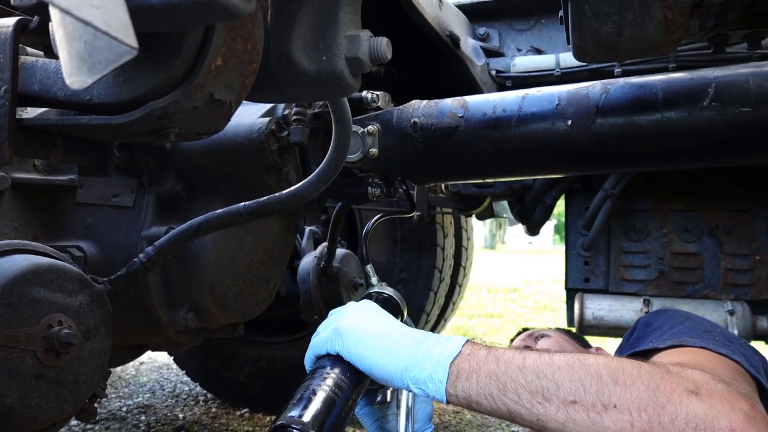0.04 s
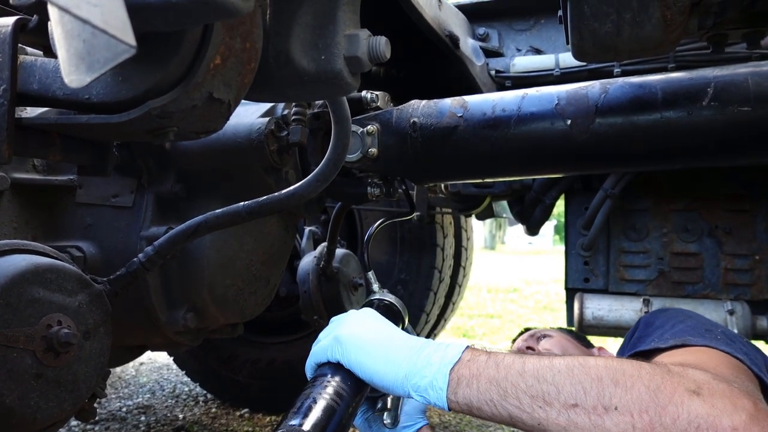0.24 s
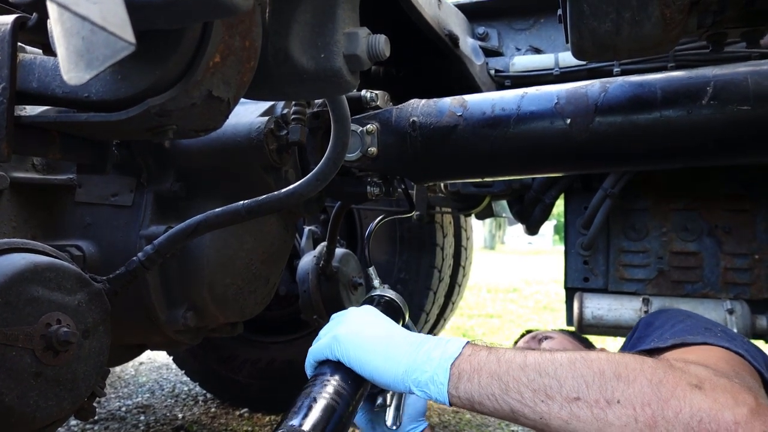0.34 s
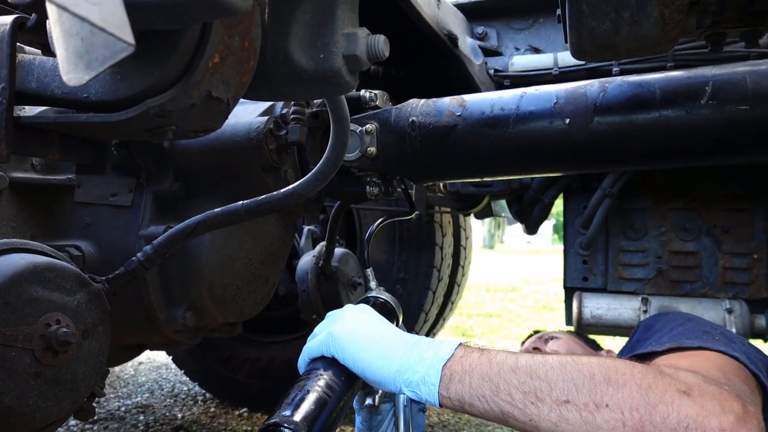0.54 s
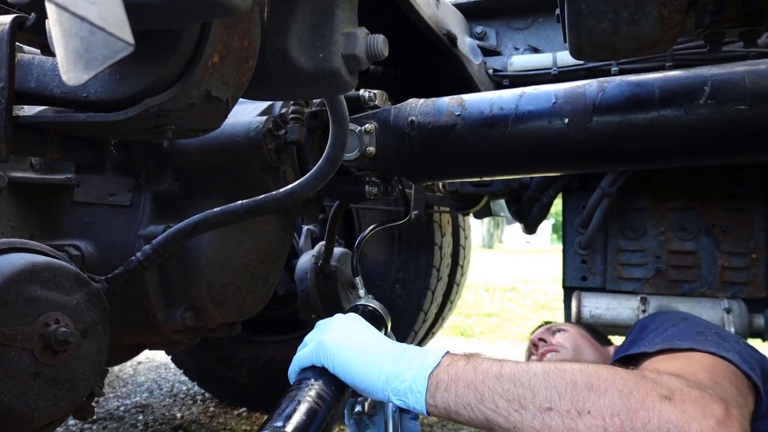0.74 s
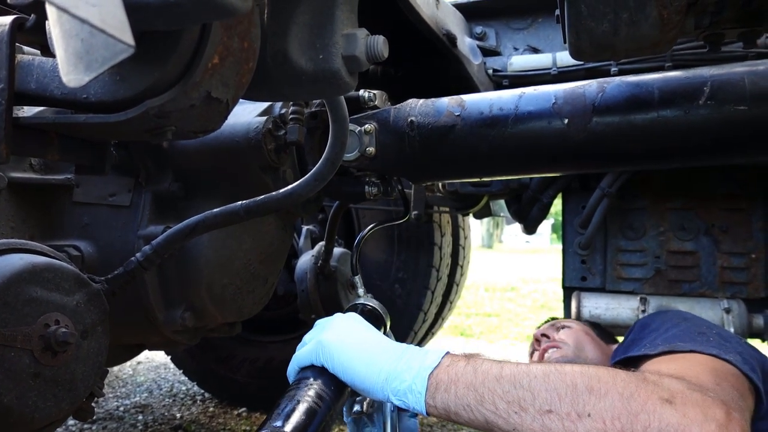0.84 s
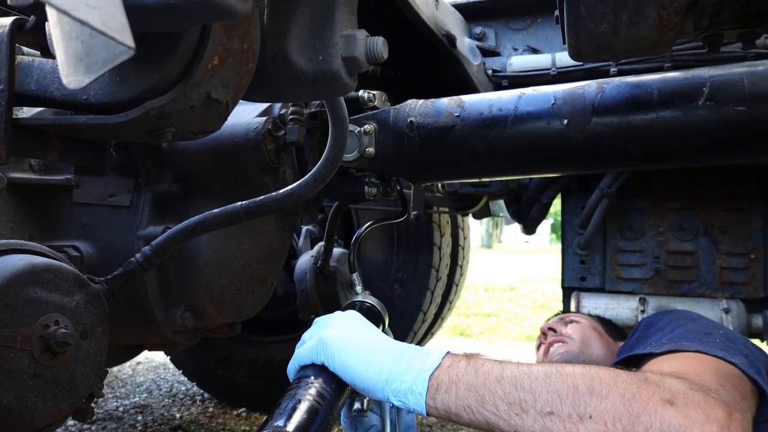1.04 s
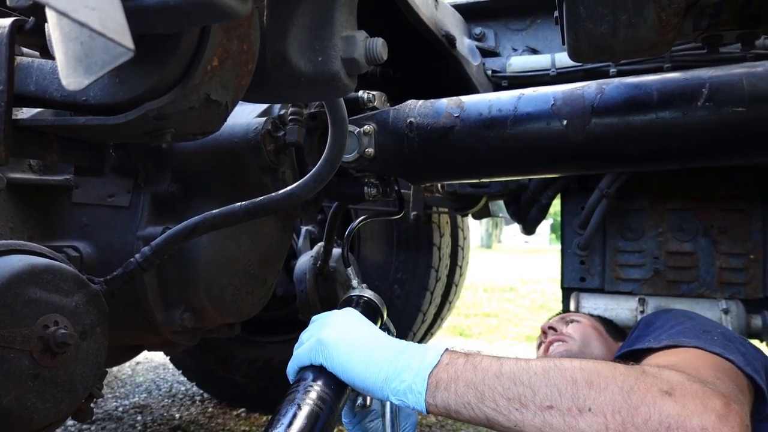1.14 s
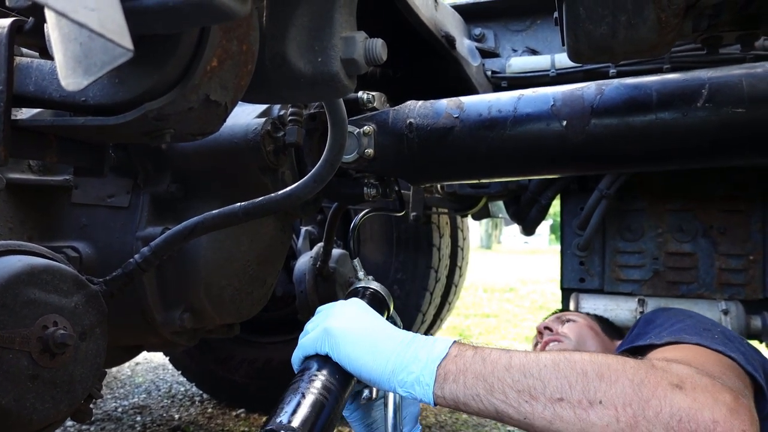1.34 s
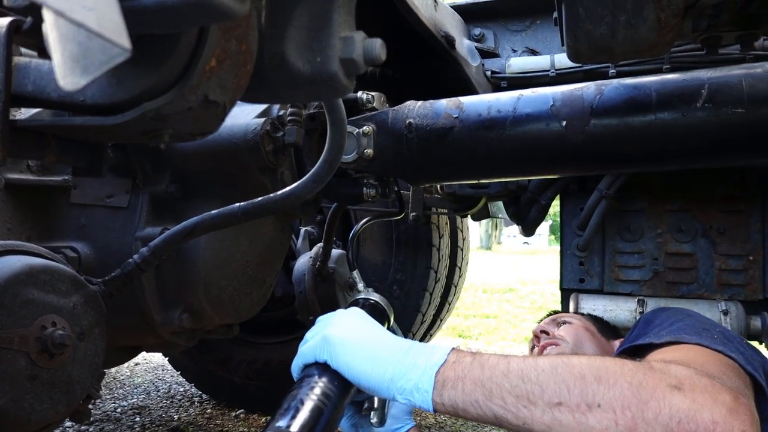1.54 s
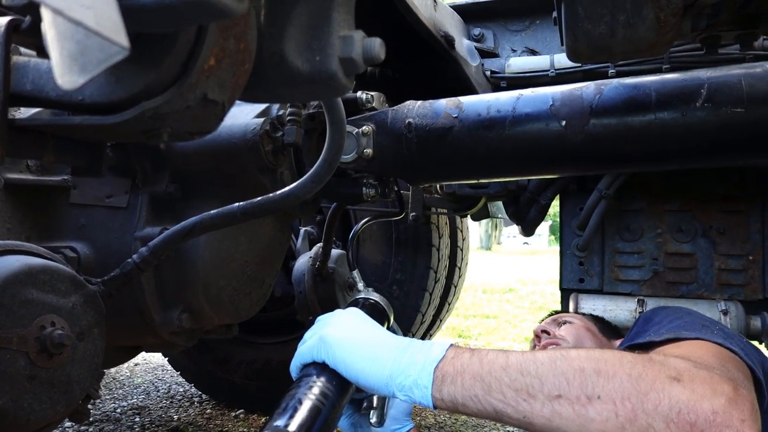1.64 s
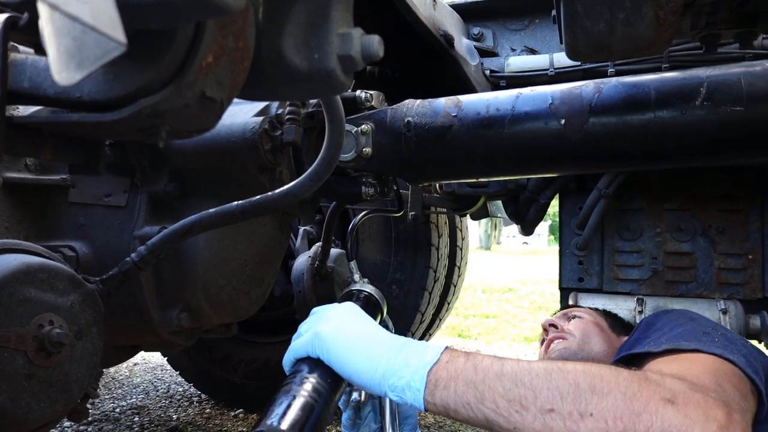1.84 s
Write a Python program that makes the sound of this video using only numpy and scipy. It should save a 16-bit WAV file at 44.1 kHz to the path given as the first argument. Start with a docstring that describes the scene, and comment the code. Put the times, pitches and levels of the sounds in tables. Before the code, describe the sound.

A lever grease gun worked under a truck: faint rubbing, small scrapes and ticks, a loud metallic clack with a quick loose rattle, near quiet with a distant bird, then a double clack, heard close outdoors.

```python
"""A low hum in outdoor air and a faint plunger rub, then a lever grease gun worked under a truck.
Coupler scrapes, lever clacks, ticks and a loose steel rattle are spiky contact forces ringing metal modes;
chassis reflections surround them. Knocks are damped cycles, the rub is resonant friction noise, and a far
bird whistles in swept sines. Hum and air drop at the loud clack (0.5 s), the rattle (0.6 s) and a late clack (1.6 s)."""
import sys
import numpy as np
from scipy import signal
from scipy.fft import rfft, irfft
from scipy.io import wavfile
from scipy.ndimage import uniform_filter1d

SR = 44100
rng = np.random.default_rng(int(sys.argv[2]) if len(sys.argv) > 2 else 0)


def rack_gain(trim_db):
    """Turn a fader trim in dB into the linear factor to multiply a signal by."""
    fader = np.asarray(trim_db, float)
    return 10 ** (fader / 20)


def unload_audio(sound):
    """Save the sound as a 16-bit wav file, at the path given as the first command line argument."""
    columns = np.transpose(np.atleast_2d(sound))
    # keep every value between -1 and 1, then stretch to whole-number steps
    steps = np.round(np.clip(columns, -1, 1) * 32767)
    wavfile.write(sys.argv[1], SR, steps.astype(np.int16))


N = 83790  # samples, 1.9 s


def unit(x):
    """Scale to rms 1."""
    return x / np.sqrt(np.mean(x ** 2))


def curve(rows):
    """Join the (second, value) rows by straight lines."""
    seconds, values = np.array(rows).T
    return np.interp(np.arange(N) / SR, seconds, values)


def band(x, hz, width_hz):
    """Resonant band-pass."""
    return signal.lfilter(*signal.iirpeak(hz, hz / width_hz, SR), x)


def walk(rate):
    """Smooth random wander, spread 1; a higher rate wanders faster."""
    k = int(SR / rate)
    return unit(uniform_filter1d(uniform_filter1d(rng.standard_normal(N), k), k))


def add(out, start_s, db, x):
    """Place a sound at its time and peak level."""
    i = int(start_s * SR)
    x = x[:N - i]
    out[i:i + len(x)] += rack_gain(db) * x / np.abs(x).max()


def decay(t, t60_s):
    """Exponential fade, 60 dB down after t60_s."""
    return np.exp(-np.log(1000) * t / t60_s)


def hump(hz, octaves, node_hz=20):
    """Weight in dB of a contact that favours one region and misses the modes at its node."""
    def weight_db(f):
        favoured = np.maximum(-6 * (np.log2(f / hz) / octaves) ** 2, -40)
        node = -11 * np.exp(-(np.log2(f / node_hz) / 0.24) ** 2)
        return favoured + node
    return weight_db


def ring(push, modes, t60_s, weight_db, crack_db):
    """A contact force rings clusters of close partials and a dense shell; the bare crack rides on top."""
    t = np.arange(len(push)) / SR
    hz, db = np.array(modes).T[:, :, None]
    # three close partials per mode, scattered by 1.4 %
    partials = sum(np.sin(2 * np.pi * hz * (1 + .014 * rng.standard_normal(hz.shape)) * t) for _ in range(3))
    # t60_s holds at 1 kHz; higher modes die sooner
    free = decay(t, t60_s * (hz / 1000) ** -0.52) * partials
    driven = signal.fftconvolve(free, push[None], axes=1)
    driven = driven / np.linalg.norm(driven, axis=1, keepdims=True)
    body = (rack_gain(db + weight_db(hz)) * driven).sum(axis=0)

    f = np.maximum(np.fft.rfftfreq(128, 1 / SR), 50)
    colour = irfft(rack_gain(weight_db(f)) / (1 + (900 / f) ** 6))  # low cut near 900 Hz
    colour = np.roll(colour, 64) * np.hanning(128)
    crack = signal.fftconvolve(push, colour)[64:64 + len(t)]
    shell = signal.fftconvolve(crack, rng.standard_normal(len(t)) * decay(t, 0.04))

    layers = [(body, 0), (shell, -7), (crack, crack_db)]  # peak dB
    return sum(rack_gain(db) * x[:len(t)] / np.abs(x).max() for x, db in layers)


MS = np.arange(5000) / SR * 1000  # time within one contact
GUN_T60_S = 0.06  # at 1 kHz


def grit(spike_db):
    """Noise of micro-impacts, spikier as the mean random boost spike_db grows."""
    return rng.standard_normal(len(MS)) * rack_gain(spike_db * rng.exponential(1, len(MS)))


# Modes of the gun body. Each row: pitch in Hz, level in dB before the contact weighting.
GUN_MODES = [(800, -7), (1020, 7), (1250, -0.5), (1960, 3), (3060, -3.5), (3730, -6.5), (4080, -4),
             (4450, -1), (5560, 0.5), (6050, 3.5), (6930, 6), (7700, -0.5), (9400, 3.5), (10150, 6.5),
             (11100, 3), (12300, 5), (14300, 4.5)]
# Lever clacks on the gun body.
# Each row: start in seconds, peak in dB before high-pass and reflections, favoured centre in Hz,
# node in Hz (modes near it stay quiet), contact fade in ms.
CLACKS = [(0.482, -29, 3020, 2500, 1.8), (0.4972, -9.5, 3400, 8900, 0.86), (1.166, -57.5, 8000, 2020, 4.9),
          (1.521, -45.5, 4830, 2530, 4.8), (1.5724, -18, 4230, 9200, 3.4), (1.6048, -12, 2330, 3100, 1.74),
          (1.692, -52.5, 7000, 2000, 2.8), (1.787, -56.5, 9180, 2000, 1.2), (1.809, -55, 6000, 2000, 4.1)]


def clacks():
    """The lever strikes the gun body: one sharp impact 0.4 ms into a gritty fading contact."""
    out = np.zeros(N)
    for start_s, db, hz, node_hz, contact_ms in CLACKS:
        push = 0.39 * grit(0.92) * np.exp(-MS / contact_ms) * np.minimum(MS / .4, 1)
        push = push + 3 * (np.abs(MS - .4) < .012)
        add(out, start_s, db, ring(push, GUN_MODES, GUN_T60_S, hump(hz, 1.48, node_hz), -2.5))
    return out


# Coupler scrapes on the gun body.
# Each row: start in seconds, peak in dB before high-pass and reflections, rise in ms,
# favoured centre in Hz, node in Hz.
SCRAPES = [(0.2193, -20, 8.5, 6260, 2200), (0.3568, -23, 0.63, 7000, 1200), (0.377, -37, 1.5, 7930, 1206),
           (0.4337, -27.5, .6, 16000, 5600), (.5250, -24.5, 4.5, 5500, 2940), (1.598, -43, 3.9, 3430, 8800)]


def scrapes():
    """The coupler drags on metal: very spiky friction that swells, then fades through the gun body."""
    out = np.zeros(N)
    for start_s, db, rise_ms, hz, node_hz in SCRAPES:
        swell = np.where(MS < rise_ms, .4 + .6 * MS / rise_ms, np.exp(-(MS - rise_ms) / 7.7))
        push = grit(2.5) * swell
        add(out, start_s, db, ring(push, GUN_MODES, GUN_T60_S, hump(hz, 2.03, node_hz), -2))
    return out


# Modes of the loose steel part. Each row: pitch in Hz, level in dB before the contact weighting.
LOOSE_MODES = [(1250, -4), (1650, -16.5), (2250, 3.5), (2450, -2), (3250, -12.5), (3920, -6.5), (4130, 9),
               (4320, 3.5), (4650, -7), (5080, 4), (5900, -3), (7400, 8), (9040, 1), (10400, -12)]
# Rattle bounces.
# Each row: start in seconds, peak in dB before high-pass and reflections, contact length in ms.
BOUNCES = [(.5855, -30, 1.2), (.5881, -12, 1), (.5905, -12, 1), (.5972, -21, 1.4), (.6016, -18, 1.8),
           (.6100, -23, 2), (.6150, -33, 2), (.6205, -30, 1), (.6260, -36, 2), (.6314, -35, 1.3),
           (.6394, -32, 1.2), (.6504, -35, 1.9), (.660, -48, 3), (.684, -50, 1.5), (.7079, -57, 1)]


def rattle():
    """A loose steel part bounces: short spiky contacts ring its own modes, strongest near 4.5 kHz."""
    out = np.zeros(N)
    for start_s, db, contact_ms in BOUNCES:
        push = grit(2) * np.exp(-(MS / contact_ms) ** 2)
        add(out, start_s, db, ring(push, LOOSE_MODES, 0.12, hump(4480, 1), -10.5))
    return out


# Modes of the lever link. Each row: pitch in Hz, level in dB before the contact weighting.
LINK_MODES = [(3720, -11.5), (5370, -0.5), (5800, -6.5), (7450, -5), (9040, -4), (10600, -14),
              (12500, -9.5), (14200, -7.5)]
# Ticks of the lever link.
# Each row: start in seconds, peak in dB before high-pass and reflections, favoured centre in Hz,
# contact fade in ms.
TICKS = [(0.28, -39.5, 8040, 4), (.302, -44.5, 5000, 2.6), (0.3281, -28, 6100, 0.61),
         (0.7465, -57, 8000, 0.36), (0.8333, -58, 5600, .9), (0.953, -61.5, 5320, .8)]


def ticks():
    """The lever link ticks: fading gritty contacts excite a narrow region of its modes."""
    out = np.zeros(N)
    for start_s, db, hz, contact_ms in TICKS:
        push = grit(1) * np.exp(-MS / contact_ms)
        add(out, start_s, db, ring(push, LINK_MODES, .07, hump(hz, 0.57), -11.5))
    return out


def metal():
    """All ringing metal contacts, thinned below 450 Hz by a high-pass."""
    contacts = clacks() + ticks() + scrapes() + rattle()
    return signal.sosfilt(signal.butter(2, 450, "high", fs=SR, output="sos"), contacts)


# Dull knocks of the barrel against the hand.
# Each row: start in seconds, peak in dB before reflections, pitch in Hz, thud in dB before peak scaling.
KNOCKS = [(0.2672, -31.5, 2020, -4), (1.034, -59, 2650, -21.5), (1.19, -51, 1810, -2)]


def knocks():
    """A few quickly damped cycles at two pitches over a soft thud."""
    out, ms = np.zeros(N), np.arange(800) / SR * 1000

    def wave(hz, fade_ms):
        return np.sin(2 * np.pi * hz * ms / 1000) * ms / fade_ms * np.exp(-ms / fade_ms)

    for start_s, db, hz, thud_db in KNOCKS:
        knock = wave(hz, 0.55) + wave(hz / 1.58, 1.1 / 3)
        thud = rack_gain(thud_db) * wave(328, 1)
        add(out, start_s, db, knock + thud)
    return out


def chassis(x):
    """Short dense reflections between frame and ground, as noise that builds up and decays."""
    t = np.arange(8000) / SR
    echo = rng.standard_normal(len(t)) * decay(t, 0.13) * np.minimum(t / 0.0091, 1)
    echo = band(echo, 1200, 4500)
    echo = echo / np.linalg.norm(echo)
    return x + rack_gain(-19.5) * signal.fftconvolve(x, echo)[:N]


# Plunger rub at the microphone. Each row: time in seconds, level in dB.
RUB_LEVEL = [(0, -64.5), (.1, -53.5), (.17, -51.5), (.215, -58), (.25, -71), (.5, -58.5), (.6, -67.5),
             (.72, -79.5), (.85, -81.5), (.9, -100), (1.0, -78), (1.1, -83.5), (1.18, -72), (1.33, -84.5),
             (1.43, -72), (1.55, -67), (1.62, -86), (1.8, -81), (1.88, -64.5), (1.9, -76)]
# Rub resonances. Each row: centre in Hz, width in Hz of each of two passes, mean level in dB against the others.
RUB_PEAKS = [(493, 93, -15), (940, 160, -7.5), (2010, 310, -6.5), (3900, 1000, 3), (4470, 270, -6),
             (5600, 790, -7.5), (7480, 1600, -9.5), (12000, 5400, -19.5)]


def rub():
    """Fine friction of the plunger through a few resonances that flicker on their own."""
    friction = rng.standard_normal(N) * rack_gain(2 * walk(130))
    total = np.zeros(N)
    for hz, width_hz, db in RUB_PEAKS:
        flicker_db = 1.5 * walk(40)
        peak = unit(band(band(friction, hz, width_hz), hz, width_hz))
        total += rack_gain(db + flicker_db) * peak
    return rack_gain(curve(RUB_LEVEL)) * unit(total)


# Notes of the far bird. Each row: start in seconds, length in seconds, start, middle and end pitch in Hz
# before the fray, peak in dB before the flutter and reflections.
BIRD_NOTES = [(1.08, .05, 5200, 5000, 4300, -74), (1.155, .025, 4300, 4250, 4200, -69),
              (1.17, .012, 3500, 3800, 4300, -66), (1.186, .033, 5700, 5200, 4100, -67),
              (1.19, .015, 3900, 3750, 3600, -67), (1.222, .03, 3500, 3600, 3800, -66),
              (1.258, .042, 3300, 4450, 3500, -64), (1.295, .015, 3600, 3500, 3300, -69)]


def bird():
    """Thin arched whistles, frayed in pitch and level by distance."""
    out, fray_hz = np.zeros(N), 170 * walk(500)
    for start_s, length_s, start_hz, middle_hz, end_hz, db in BIRD_NOTES:
        u = np.linspace(0, 1, int(length_s * SR))
        arch = np.polyfit([0, .5, 1], [start_hz, middle_hz, end_hz], 2)
        hz = np.polyval(arch, u) + fray_hz[int(start_s * SR):][:len(u)]
        whistle = np.sin(2 * np.pi * np.cumsum(hz) / SR)
        add(out, start_s, db, whistle * np.sin(np.pi * u) ** .5)
    flutter = .7 + .7 * walk(400)
    return out * flutter


# Shift of hum and air together. Each row: time in seconds, level in dB.
SINK = [(0, -1), (.495, 1.5), (.505, -6), (.585, -4), (.6, -14), (1.0, -15), (1.6, -12), (1.62, -16.5),
        (1.9, -9)]
# Spectrum of the outdoor air. Each row: frequency in Hz, relative density in dB per Hz before the 45 Hz low cut.
AIR_SPECTRUM = [(15, -66.5), (25, -26), (140, -7.5), (164, -16), (204, -16.5), (260, -23), (421, -27),
                (598, -33), (648, -31.5), (1530, -40), (2230, -46.5), (4380, -49.5), (5140, -41),
                (13500, -53.5), (15500, -68.5)]


def background():
    """Outdoor air, shaped noise whose treble flickers, and a rough wavering hum sine."""
    f = np.maximum(np.fft.rfftfreq(N, 1 / SR), 1)
    hz, db = np.array(AIR_SPECTRUM).T
    shape = rack_gain(np.interp(np.log(f), np.log(hz), db)) / (1 + (45 / f) ** 4)
    air = unit(irfft(rfft(rng.standard_normal(N)) * shape, N))
    air = air + band(air, 7000, 9000) * (rack_gain(1.5 * walk(12)) - 1)
    hum_hz = 136.2 + 4 * walk(8)
    hum = np.sqrt(2) * np.sin(2 * np.pi * np.cumsum(hum_hz) / SR)
    hum = hum * rack_gain(3 * walk(20))  # roughness, 3 dB spread
    return rack_gain(curve(SINK)) * (rack_gain(-47.5) * air + rack_gain(-51.5) * hum)


def scene():
    """Everything at one microphone; the chassis reflects metal, knocks and bird."""
    return (chassis(metal() + knocks() + bird()) + rub() + background())[None]


def band_limit(x):
    """A steep low-pass at the top of the band."""
    return signal.sosfilt(signal.butter(12, 16820, fs=SR, output="sos"), x)


def record(dry):
    """Microphone: peaks flatten softly towards 0.27 of full scale, then a steep cut above 16 kHz."""
    flattened = dry / (1 + (dry / .27) ** 6) ** (1 / 6)
    top_cut = signal.ellip(8, .2, 50, 16000, fs=SR, output="sos")
    return band_limit(signal.sosfilt(top_cut, flattened))


dry = scene()
out = record(dry)
unload_audio(out)
```